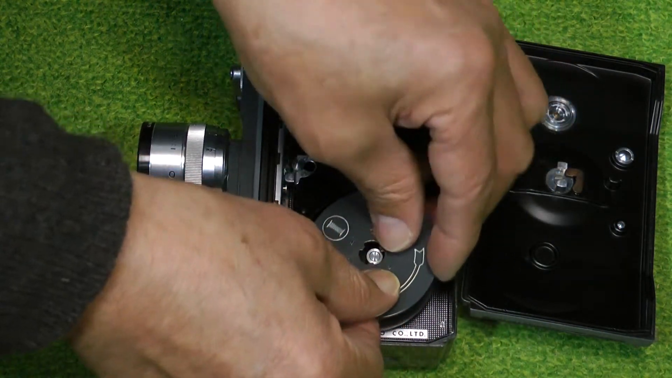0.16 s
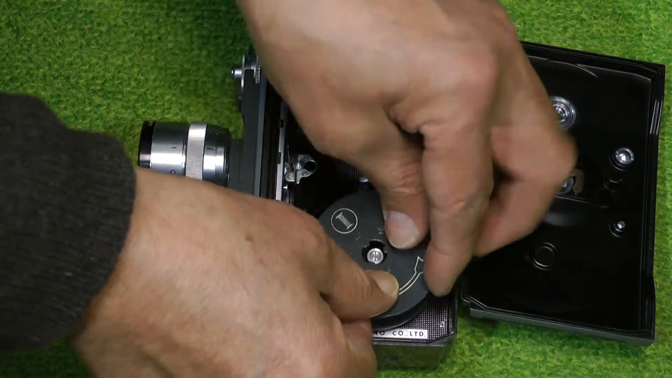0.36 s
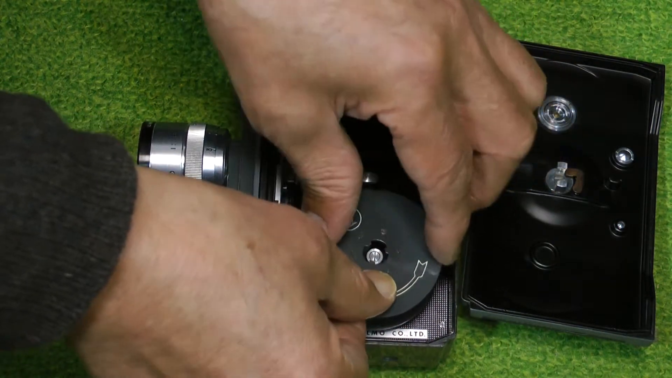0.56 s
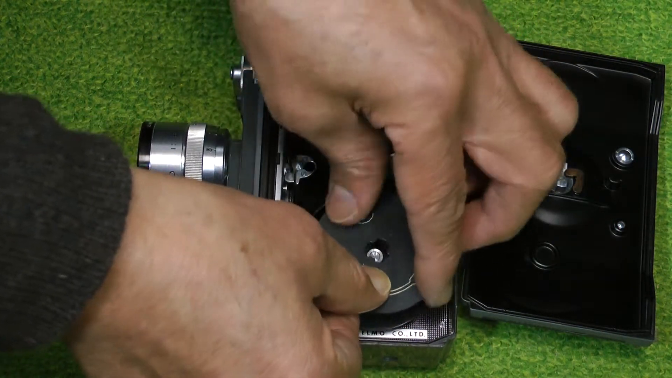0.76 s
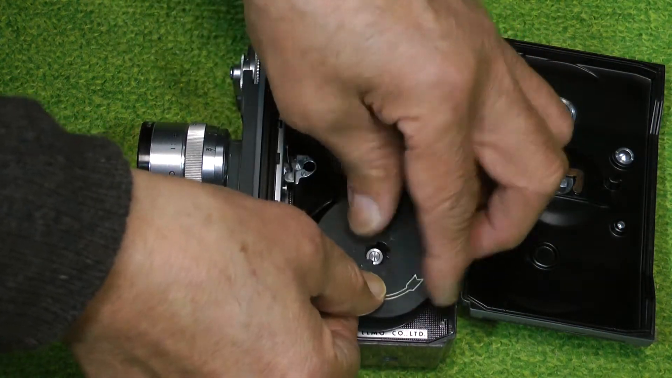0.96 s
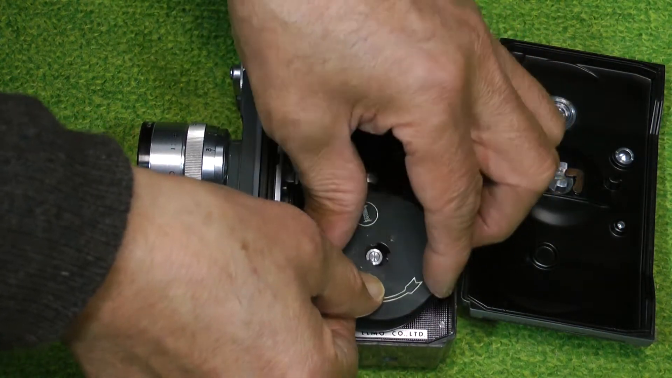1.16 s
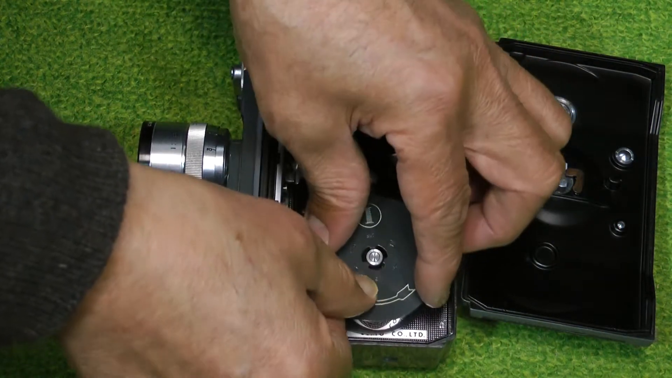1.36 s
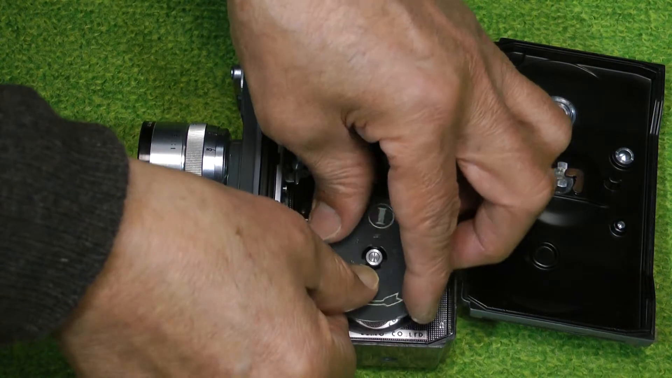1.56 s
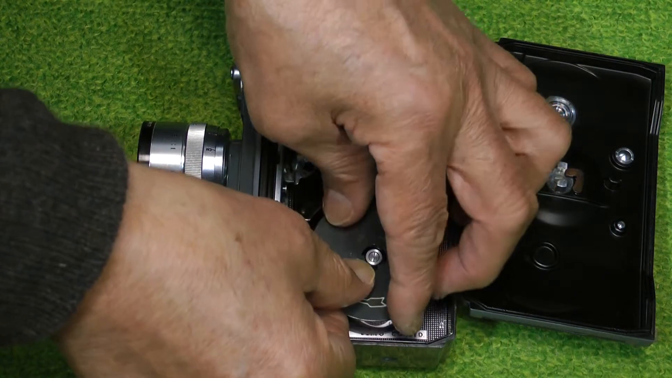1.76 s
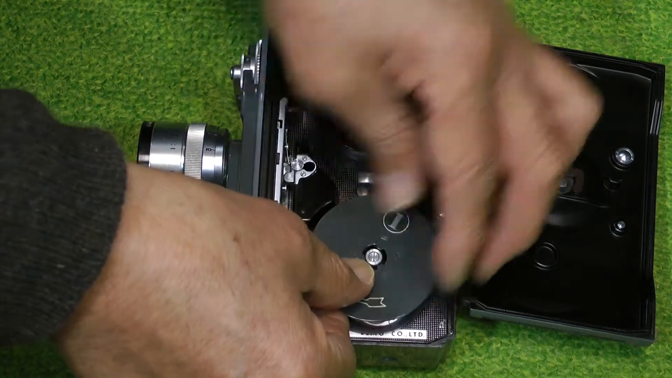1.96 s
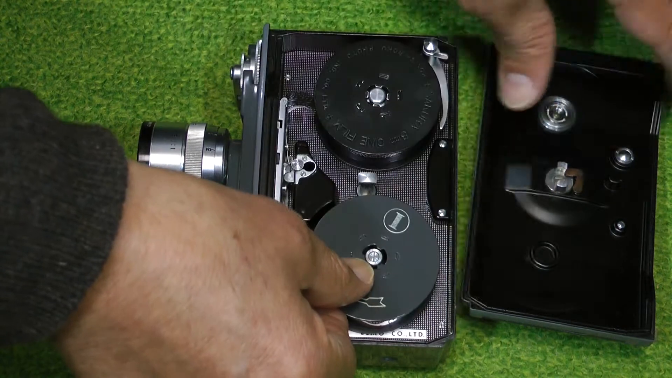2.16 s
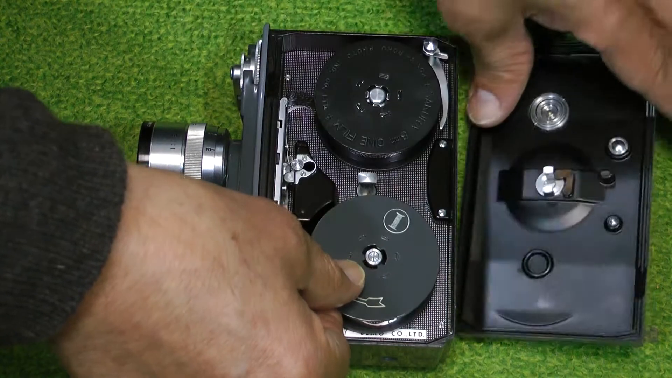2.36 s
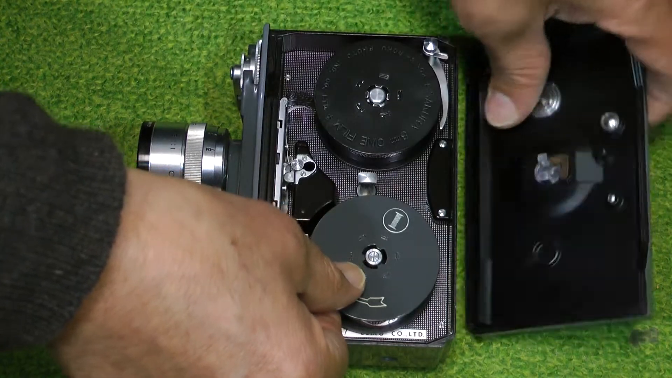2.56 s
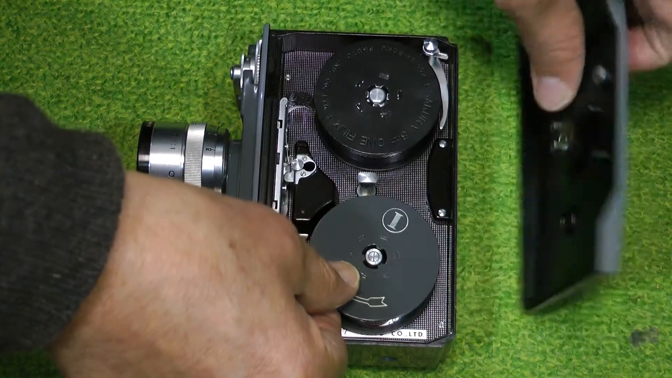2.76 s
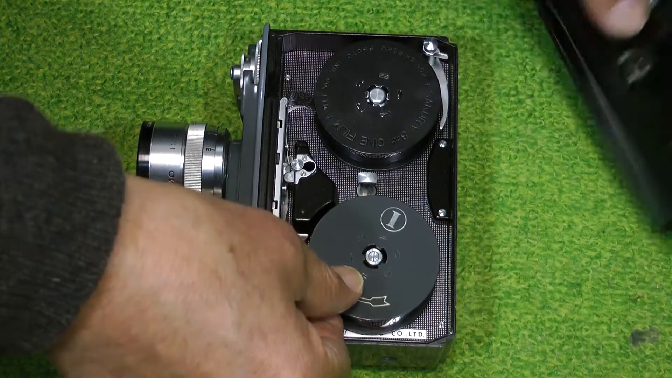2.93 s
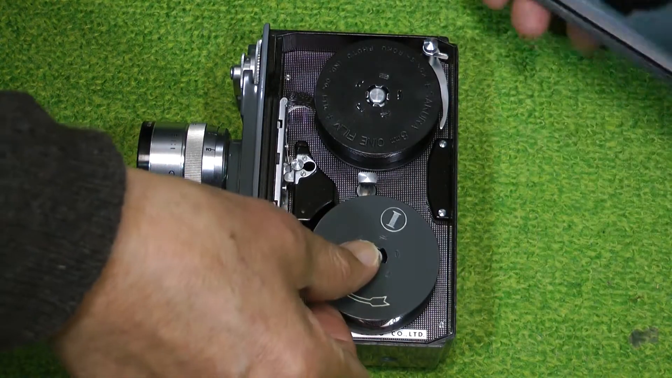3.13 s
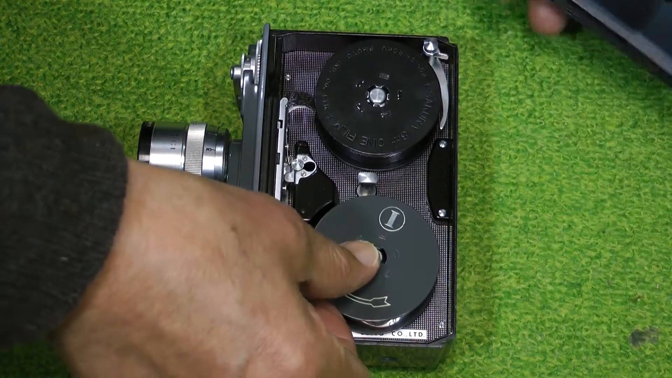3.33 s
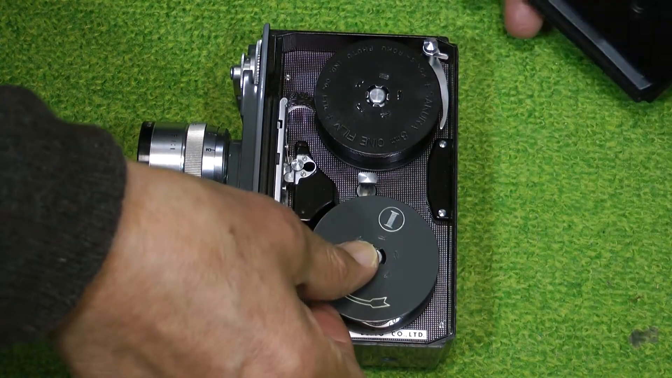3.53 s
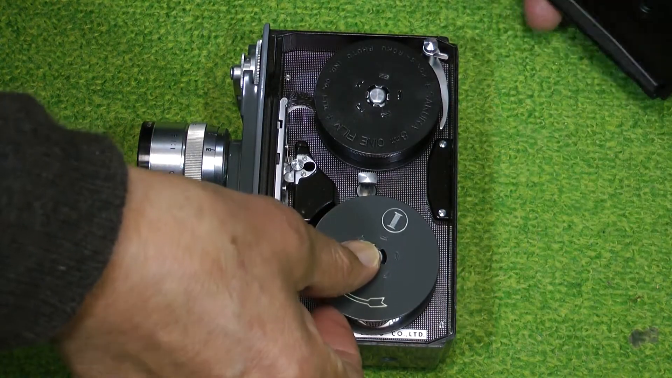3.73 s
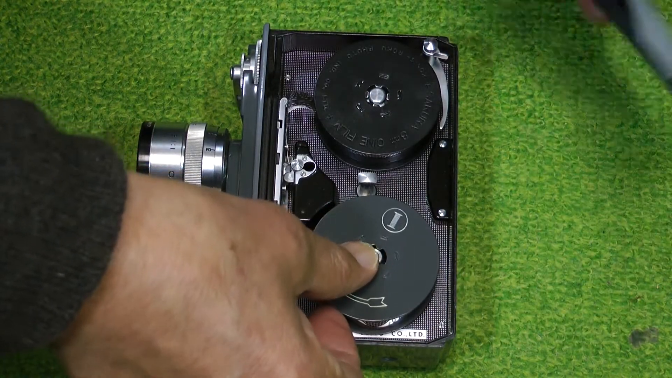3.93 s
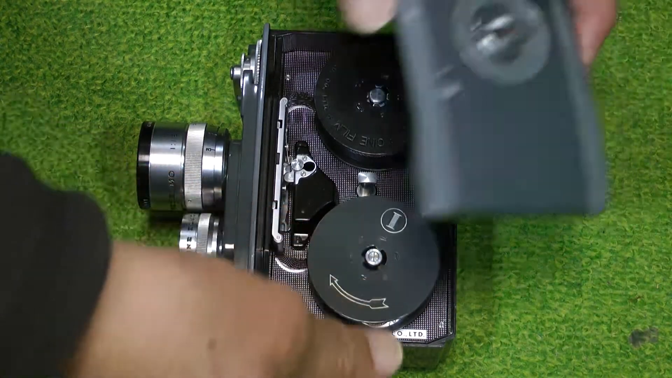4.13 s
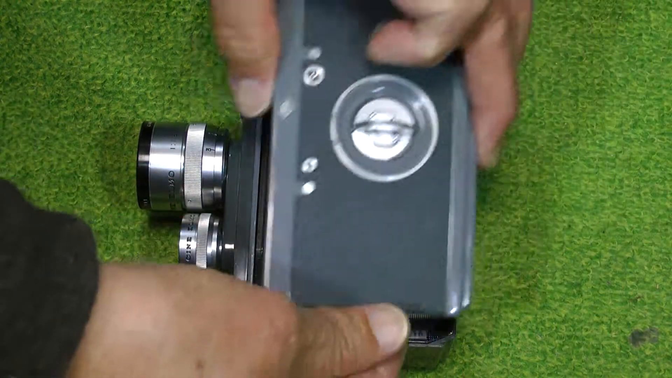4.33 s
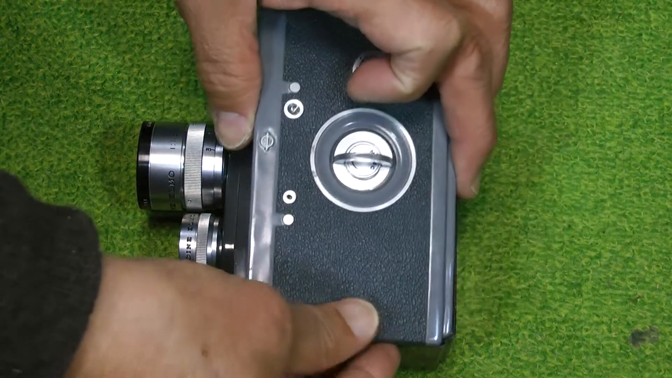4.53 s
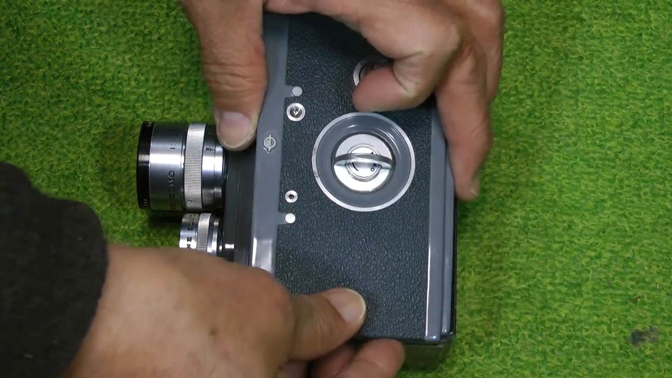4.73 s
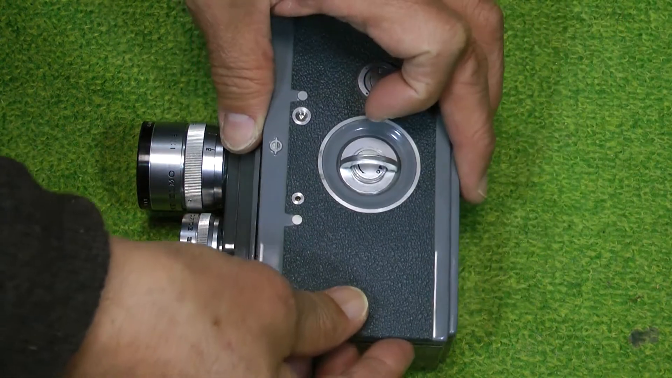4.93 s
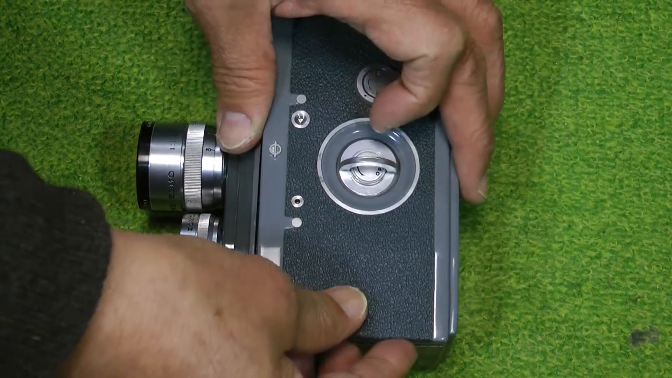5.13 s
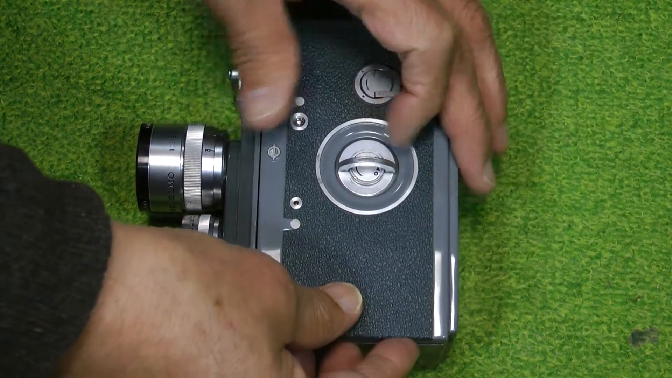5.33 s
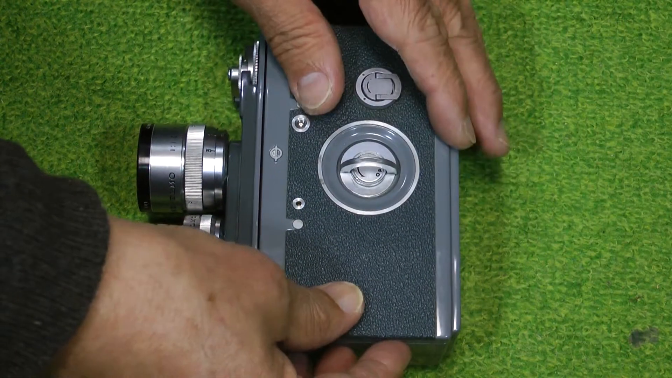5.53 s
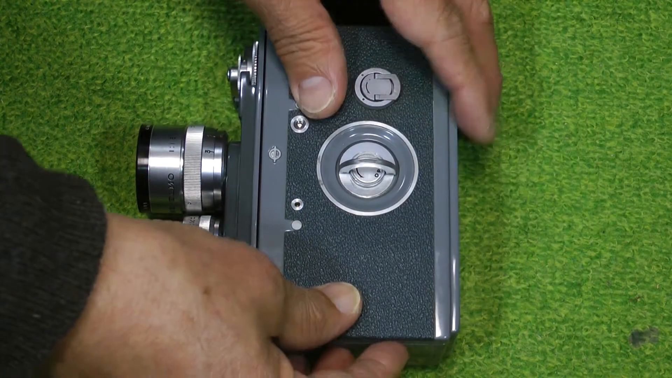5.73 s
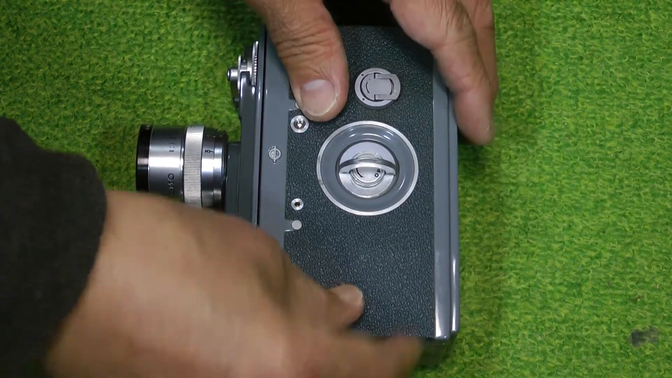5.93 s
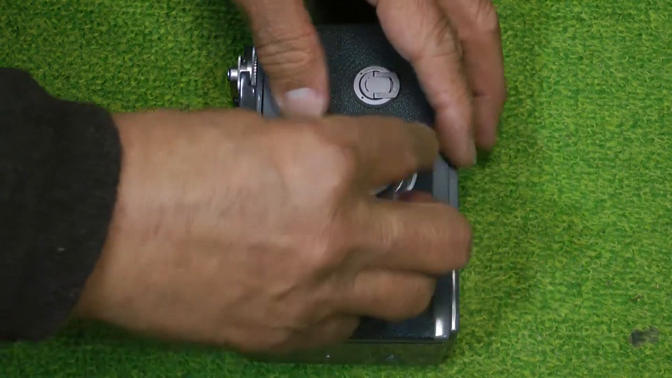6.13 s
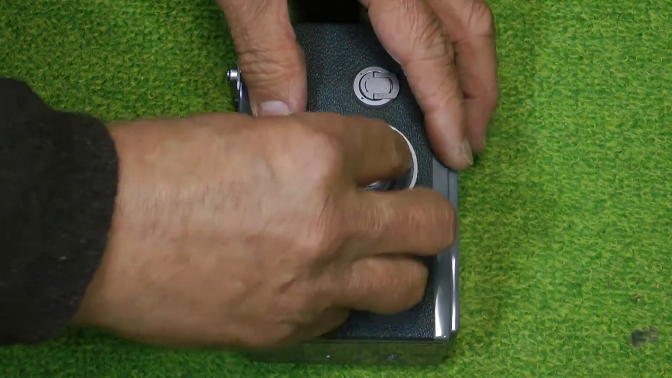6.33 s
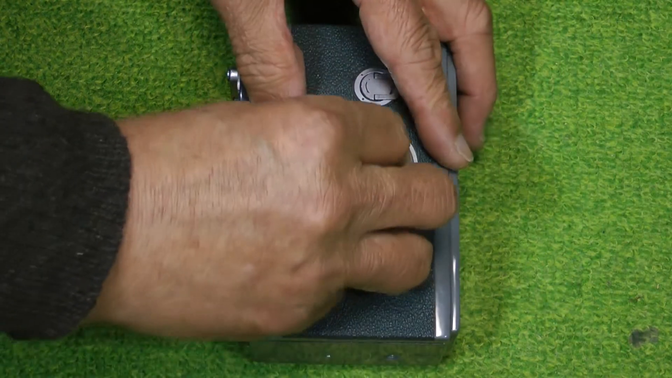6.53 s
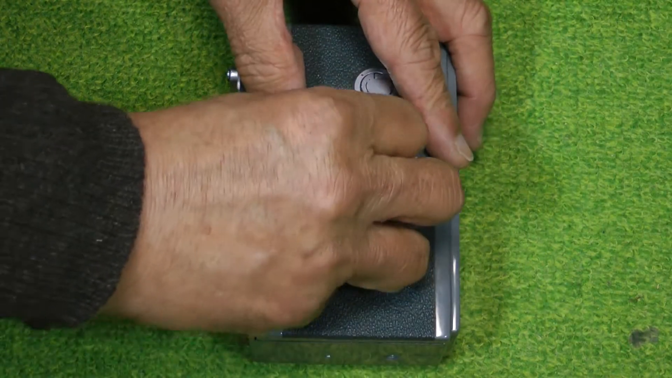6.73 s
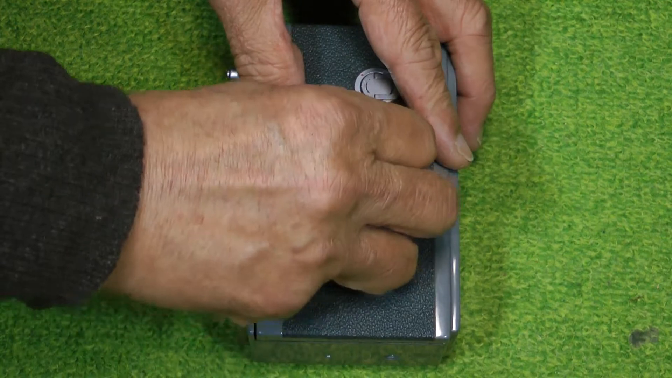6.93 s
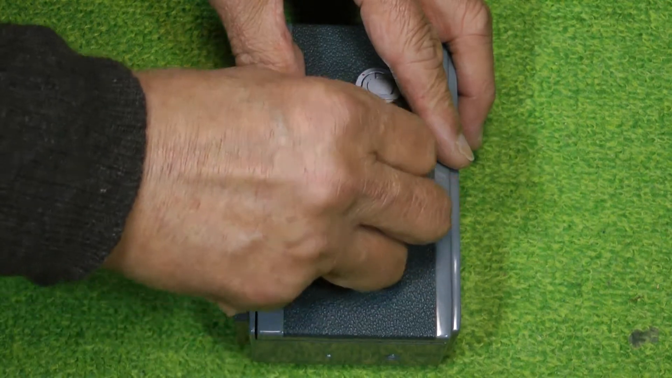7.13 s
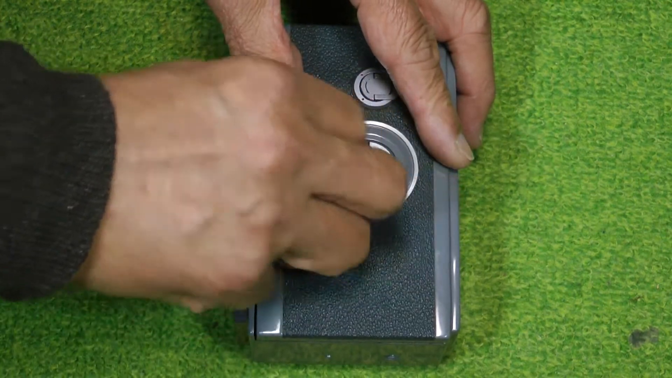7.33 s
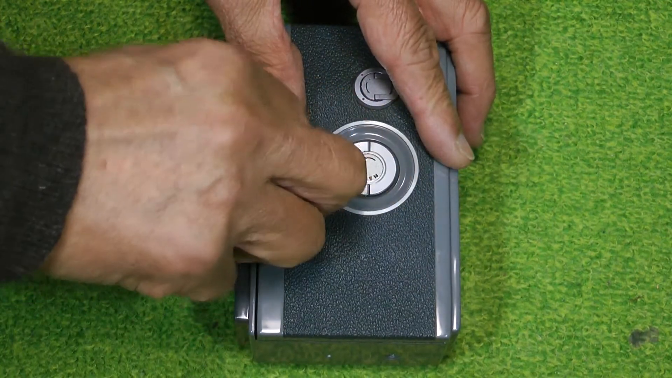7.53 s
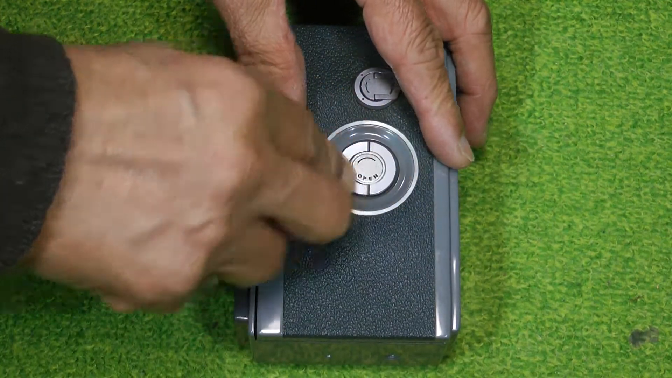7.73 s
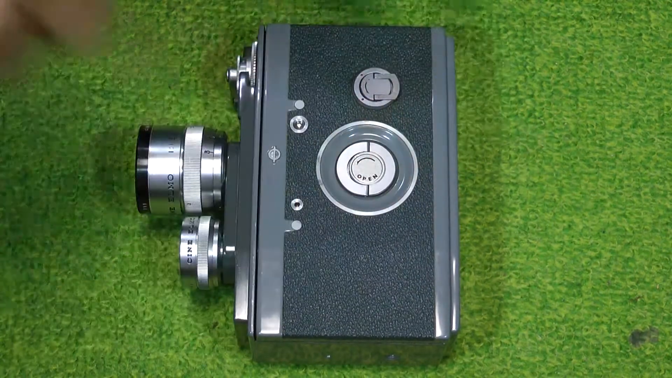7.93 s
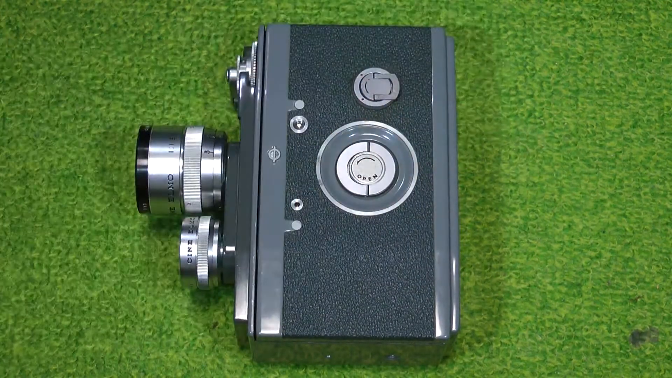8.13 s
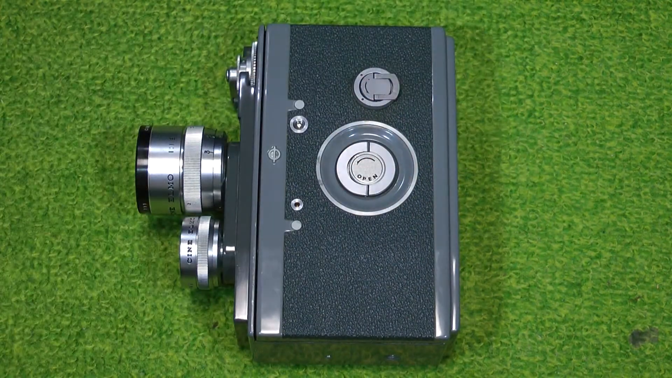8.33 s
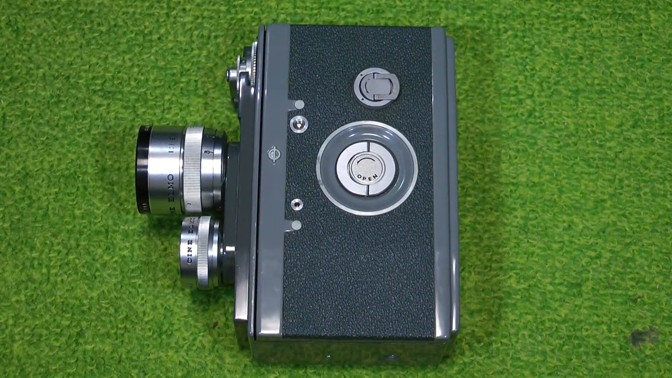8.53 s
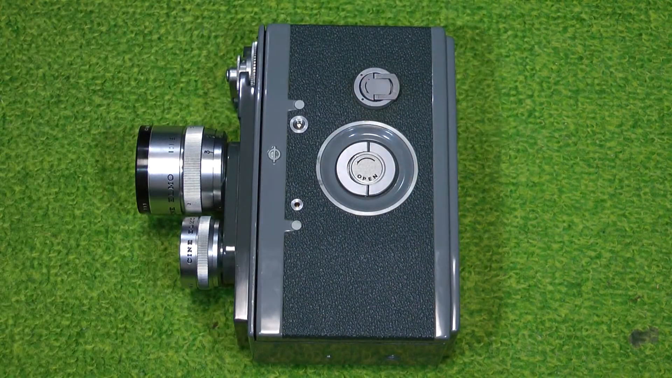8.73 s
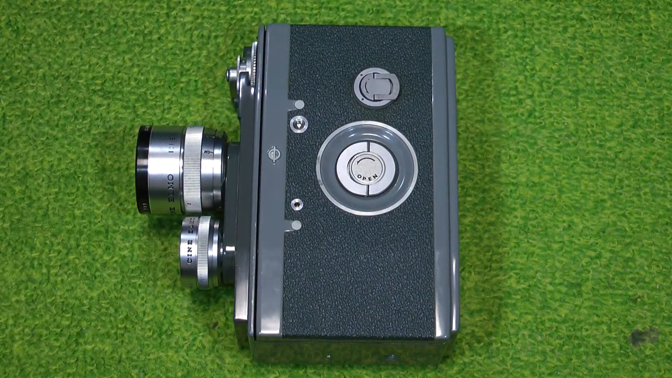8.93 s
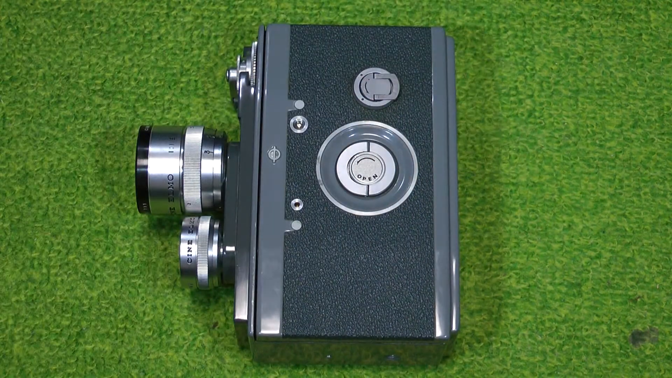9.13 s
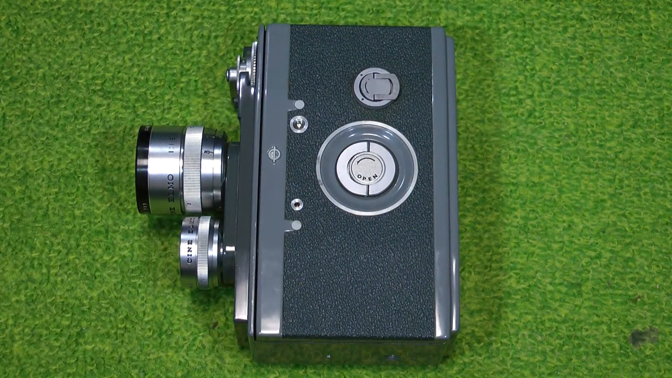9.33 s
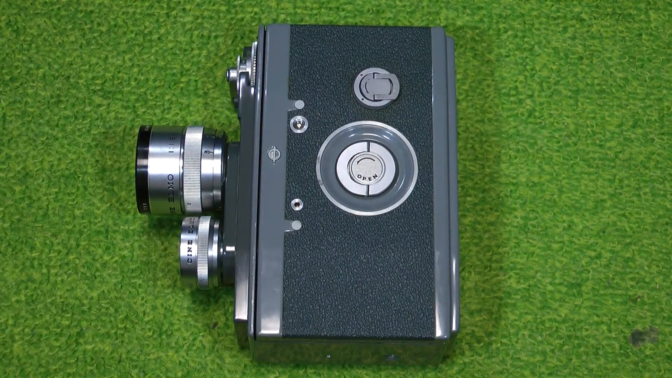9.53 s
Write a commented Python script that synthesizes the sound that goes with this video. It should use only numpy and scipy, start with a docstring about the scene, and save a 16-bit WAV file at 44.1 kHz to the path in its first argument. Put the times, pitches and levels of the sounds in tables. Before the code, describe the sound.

A metal spool knocks, bounces and scrapes as fingers turn it inside a small film camera. The loose lid is picked up with a ringing clack and dragged over felt, then pressed onto the case with clicks and short creaks. A latch spring rings faintly, the lock key snaps flat with a brief rattle, and a sleeve brushes away. The microphone is close, in a quiet, humming room.

```python
"""A small clockwork film camera lies on a felt mat, close under the microphone, in a quiet, humming room.
A metal spool knocks and bounces on its spindle and scrapes as fingers turn it. The lid is picked up,
ringing, dragged over the mat and pressed onto the case, where it creaks, slips and seats. The latch
leaves a spring ringing; the lock key is turned, snaps flat and rattles, and a sleeve brushes away.
Clicks are noise cracks plus ringing modes, rubs are grainy noise; the hardest clicks overload a limiter."""
import sys
import numpy as np
from scipy import signal
from scipy.fft import rfft, irfft, next_fast_len
from scipy.io import wavfile
from scipy.ndimage import uniform_filter1d

SR = 44100
rng = np.random.default_rng(int(sys.argv[2]) if len(sys.argv) > 2 else 0)


def generate_wav(sig):
    """Save sig (samples, or channels by samples) to the path in sys.argv[1] as 16-bit PCM at SR."""
    pcm = np.round(np.clip(np.atleast_2d(sig).T, -1, 1) * 32767).astype(np.int16)
    wavfile.write(sys.argv[1], SR, pcm)


N = 426888
TIME = np.arange(N) / SR

# Room tone, rumble up to hiss: freq_hz, gain_db
ROOM_EQ = [(20, -7), (60, 4.5), (85, 1.5), (180, -2), (260, -2.5), (350, -4), (600, -12), (1500, -16),
           (3500, -20.5), (8000, -27), (16000, -29)]
# Mains hum and a faint whine at 915 Hz: pitch_hz, level_db
HUM_TONES = [(59.7, -61.5), (119.8, -74), (179, -74), (360, -76), (915, -80.5)]

# Fingers push the spool round: start_s, length_s, level_db
FINGER_PUSHES = [(0.0, 0.01, -35), (0.06, 0.18, -54.5), (0.395, 0.029, -39.5), (0.52, 0.49, -50),
                 (1.0, 0.014, -53), (1.09, 0.041, -53), (1.21, 0.11, -52)]
# Tone of that rub: freq_hz, gain_db
FINGER_EQ = [(200, -12), (600, -8), (1400, 0.5), (2400, -6), (3500, 3), (4700, -11), (6500, -5),
             (9000, -20), (13000, -15), (16000, -33.5)]
# The spool's ring: pitch_hz, width_hz, height_db
SPOOL_RING = [(272, 66, 20.5), (778, 58, 1), (1342, 180, 9), (2310, 20, 10), (2600, 200, -6),
              (3450, 60, 7.5), (3463, 330, 16.5), (4003, 110, 14.5), (6030, 750, 5.5), (7790, 37, 12),
              (9200, 700, 4), (11920, 100, 19)]
# Spool on spindle: start_s, level_db, thud_db, knock_db, treble_db_per_octave, bounce_count (-1 mutes)
# In all hit tables, level is at 1.6-4.4 kHz; thud (130-450 Hz) and knock (450-1600 Hz) are relative to it.
SPOOL_KNOCKS = [(0.0522, -36.5, -15, -30, -6.5, 0), (0.2554, -29.5, -13, -10, -5.5, 0),
                (0.2925, -12, -18.5, -17, -2.5, 0), (0.604, -39.5, -12, -11, -6, -1),
                (0.7234, -38.5, -19, -19, -4.5, 0), (0.7417, -17.5, -4.5, -1, -15, 0),
                (0.8843, -11, -11.5, 2.5, -7, 2), (1.2985, -17, -16, 4.5, -9.5, 3.5),
                (1.5454, -30.5, -13.5, -6, -8, 1), (1.6982, -37, -17.5, -8.5, -5.5, 0),
                (1.795, -45, -16.5, -4, -17, 0), (1.991, -57, -8.5, 11.5, -26, -0.5),
                (2.058, -57.5, -11, 13, -22, 0)]
# Hands and lid bump the mat: middle_s, level_db, spread_s
MAT_BUMPS = [(.76, -46, 0.069), (2.44, -42.5, 0.039), (2.61, -37, 0.015), (2.745, -34.5, 0.027),
             (2.85, -43.5, 0.04), (3.90, -51.5, 0.026), (5.15, -45.5, 0.03), (5.62, -44, 0.021),
             (6.27, -52.5, 0.091), (6.78, -35, 0.019), (6.88, -51, 0.047), (7.33, -53, 0.046)]
# Their dull tone: freq_hz, gain_db
BUMP_EQ = [(30, -19.5), (70, -2), (125, 1.5), (190, -16.5), (280, -3.5), (400, -18.5), (700, -29.5),
           (3000, -56.5)]
# The spool's rim scrapes the case: start_s, length_s, level_db
RIM_SCRAPES = [(1.325, 0.022, -28), (1.38, 0.12, -50), (1.545, 0.053, -40), (1.625, 0.12, -40),
               (1.75, 0.19, -49.5)]
# Tone of the scrape: freq_hz, gain_db
RIM_EQ = [(300, -10), (1400, 3.5), (2500, 2.5), (3600, -1.5), (6500, -7), (7800, 0), (9200, -18.5),
          (11750, -10), (16000, -27)]

# The lid slides over the mat: start_s, length_s, level_db
LID_SLIDES = [(2.3, .18, -39), (2.575, 0.65, -42), (2.69, 0.21, -38.5), (3.22, 0.22, -53.5),
              (3.33, 0.12, -48.5), (3.48, 0.05, -46), (3.575, 0.025, -44.5), (3.66, 0.1, -53),
              (3.79, 0.33, -49), (4.08, 0.15, -61)]
# Tone of the slide: freq_hz, gain_db
SLIDE_EQ = [(300, -6), (600, -10), (1500, -13.5), (2100, 3.5), (3800, -6), (4500, -5), (6400, -6.5),
            (7200, -10.5), (12000, -9), (16000, -22)]
# The loose lid's ring: pitch_hz, width_hz, height_db
LID_RING = [(759, 40, 16), (879, 4.9, 31.6), (1552, 260, 16.9), (1965, 18, 16), (2456, 53, 11),
            (2744, 89, 12), (3102, 85, 12), (3476, 200, 17.6), (3930, 110, 16), (5310, 160, 7.1),
            (5740, 670, 11), (6320, 300, 14), (8780, 180, 11), (12600, 68, 9.7)]
# The lid is knocked and lifted: start_s, level_db, thud_db, knock_db, treble_db_per_octave
LID_KNOCKS = [(2.3372, -5, -23, -19, -12.5), (2.3606, -17.5, -17, -3.5, -17.5),
              (2.4256, -11.5, -16.5, -13, -21.5), (2.6781, -44.5, -36, 14.5, -7),
              (3.0016, -32.5, -25, -40, -9), (3.1973, -39.5, -2.5, -1.5, -22.5),
              (3.3331, -27.5, -21.5, -6, -26), (3.3941, -14, -44.5, -19.5, -7),
              (4.0925, -34.5, -10, 2, -11)]

# Lid and latch seat: start_s, level_db, thud_db, knock_db, treble_db_per_octave, slip_count
CASE_CLICKS = [(4.7825, -18, -12, -1.5, -26, 0), (4.8798, -53, 2, 16, -13, 0),
               (4.958, -43, -7.5, -4.5, -11, 0), (5.024, -32, -1, 7, -20.5, 0),
               (5.0618, -45, -8.5, 23.5, -21, 0), (5.1271, -19.5, -14, -4.5, -19, 0),
               (5.2242, -24, -10, 1, -15.5, 0), (5.2633, -9.5, -12.5, 2, -14, 0),
               (5.5629, -7, -12, -4.5, -11.5, 2), (6.2115, -52, 7, 25, -20, 0),
               (6.2345, -28.5, -4, 16, -18.5, 1), (6.2427, -15.5, -14.5, -3, -25, 0),
               (6.3064, -26, -3.5, 2, -18.5, 0), (6.4937, -22, -8, 10.5, -11, 2),
               (6.9704, -28, -18.5, -7, -20, 0), (8.0717, -31.5, -10, -12, -14.5, 0)]
# The closed case's ring: pitch_hz, width_hz, height_db
CASE_RING = [(253, 59, 19), (344, 110, 11), (609, 60, 15.65), (830, 51, 14), (1200, 110, 13),
             (1420, 810, 8.6), (1760, 56, 7.1), (2560, 110, 5.1), (3643, 320, 13), (4044, 50, 9.6),
             (4870, 100, 1.3), (5440, 190, 5), (7800, 60, 3.2)]
# The lid creaks in its seat: middle_s, level_db, spread_s
SEAT_CREAKS = [(5.0, -39, 0.025), (5.185, -39, 0.011), (5.252, -33, 0.0092), (5.46, -39, 0.017),
               (5.545, -32, 0.013), (6.172, -37, 0.017), (6.293, -33.5, 0.017), (6.425, -35, 0.0041)]
# Tone of the creak: freq_hz, gain_db
CREAK_EQ = [(150, -20), (400, -6.5), (650, 8.5), (950, -5), (1500, -15.5), (3400, -20), (6000, -29.5),
            (14000, -47.5)]

# The sleeve passes: middle_s, level_db, spread_s
SLEEVE_PASSES = [(5.79, -57.5, 0.044), (6.1, -61.5, 0.095), (6.55, -61, 0.27), (7.48, -55.5, 0.16),
                 (8.0, -47, .12), (8.3, -43, 0.091), (8.71, -60.5, 0.083)]
# Tone of cloth and fingertips: freq_hz, gain_db
SOFT_RUB_EQ = [(150, -5), (340, 1), (700, -3), (1400, 0), (3300, -2), (4800, -10.5), (7500, -16.5),
               (13000, -18), (16000, -31)]
# Fingers turn the lock key: start_s, length_s, level_db
KEY_TURNS = [(6.135, .2, -53), (6.715, .24, -45.5), (7.265, .1, -55)]
# The key snaps flat: start_s, level_db, thud_db, knock_db, treble_db_per_octave
KEY_SNAPS = [(7.5176, -11.5, -16, -2.5, -1.5)]
# The key's ring: pitch_hz, width_hz, height_db
KEY_RING = [(726, 18, 7.8), (1300, 86, 11), (2630, 330, 8.9), (4170, 130, 4.5), (5970, 330, 11),
            (9000, 80, 11), (8900, 66, 13), (9900, 42, 5.2), (10700, 90, 8), (12380, 110, 10)]
# Tone of its hinge rattle: freq_hz, gain_db
RATTLE_EQ = [(300, -2.5), (1300, -7.5), (3000, -3.5), (4100, -0.5), (6500, -15), (9300, 4), (13000, -1.5),
             (16000, -15.5)]

# Five bands that shape each click: edge_hz
CLICK_BANDS = [130, 450, 1600, 4400, 8500, 16000]
# Final tone of all clicks: freq_hz, gain_db
CLICK_EQ = [(60, -2.5), (120, -0.5), (175, -11), (240, -1), (9000, 1), (12500, 3), (16000, -7.5)]
# Leftward lean of clicks, scaled for each part: freq_hz, left_minus_right_db
CLICK_PAN = [(60, 2), (250, 4.5), (600, 6.5), (1200, 5), (2200, 1), (4000, .7), (10000, 2.5)]
# How alike noise is in the two channels: freq_hz, correlation
STEREO_LIKENESS = [(50, 0.53), (200, 0.1), (1000, 0.51), (3000, 0.96), (6000, 0.16), (12000, .15)]


def from_db(db):
    return 10 ** (np.asarray(db) / 20)


def rms_one(x):
    return x / np.sqrt(np.mean(x ** 2) + 1e-20)


def at_hz(points, hz):
    """Reads a curve on a log-frequency axis."""
    known_hz, values = np.transpose(points)
    return np.interp(np.log(np.maximum(hz, 1)), np.log(known_hz), values)


def eq(x, points):
    """Minimum-phase EQ through points of freq_hz, gain_db."""
    size = 2 * next_fast_len(x.shape[-1] // 2 + 1)
    cepstrum = irfft(np.log(from_db(at_hz(points, np.fft.rfftfreq(size, 1 / SR)))))
    cepstrum[1:size // 2] *= 2
    cepstrum[size // 2 + 1:] = 0
    return irfft(rfft(x, size) * np.exp(rfft(cepstrum)))[..., :x.shape[-1]]


def strokes(rows, attack_s, sag_db_per_s, release_t60_s):
    """Envelope of pushes: each gets going, loses speed, then dies away."""
    power, t = np.zeros(N), TIME[:2 * SR]
    for start_s, length_s, level_db in rows:
        release_db = 60 * np.maximum(t - length_s, 0) / release_t60_s
        gain = np.clip(t / attack_s, 0, 1) * from_db(level_db - sag_db_per_s * t - release_db)
        start = round(start_s * SR)
        power[start:start + len(t)] += gain[:N - start] ** 2
    return np.sqrt(power)


def swells(rows):
    """Envelope of smooth moves, each a bell curve."""
    return sum(from_db(level_db) * np.exp(-.5 * np.minimum(((TIME - middle_s) / spread_s) ** 2, 100))
               for middle_s, level_db, spread_s in rows)


def repeated(hits, gap_s, loss_db):
    """Gives each hit its run of weaker touches: after it, or before it if the gap is negative."""
    return [(start_s + k * gap_s, level_db - k * loss_db, *tone)
            for start_s, level_db, *tone, count in hits for k in range(round(count) + 1)]


def stereo_noise():
    """White noise whose stereo width varies with frequency."""
    size = next_fast_len(N)
    alike = at_hz(STEREO_LIKENESS, np.fft.rfftfreq(size, 1 / SR))
    mid, side = rfft(rng.standard_normal((2, size)))
    spectrum = np.sqrt(1 + alike) * mid + np.sqrt(1 - alike) * side * [[1], [-1]]
    return rms_one(irfft(spectrum, size)[:, :N])


def dying_noise(t, t60_s, channels):
    """A burst of unit energy: countless small modes that die together."""
    burst = rng.standard_normal((channels, len(t))) * from_db(-60 * t / t60_s)
    return burst / np.sqrt(np.sum(burst ** 2, axis=1, keepdims=True))


def ringing(modes, t, scatter_db=0, damping_hz=0):
    """Decaying sines; scatter varies their strength from touch to touch and between channels."""
    hz, width_hz, height_db = np.transpose(modes)
    scatter = rng.standard_normal(len(hz)) + rng.standard_normal((2, len(hz)))
    strength = from_db(height_db + scatter_db * scatter) * 2 * np.pi * width_hz / SR
    polarity = (-1) ** np.arange(len(hz))
    decay = np.exp(-np.pi * np.outer(width_hz + damping_hz, t))
    return (strength * polarity) @ (decay * np.sin(2 * np.pi * np.outer(hz, t)))


def band_levels(x, size=441):
    """Level in dB of the first 10 ms in each click band."""
    power = np.mean(np.abs(rfft(x[:, :size], 10 * size)) ** 2, axis=0) / (10 * size ** 2 / 2)
    hz = np.fft.rfftfreq(10 * size, 1 / SR)
    return 10 * np.log10(np.histogram(hz, CLICK_BANDS, weights=power)[0])


def panned(x, pan_db):
    """Makes the left channel louder than the right by pan_db."""
    return x * from_db([[pan_db / 2], [-pan_db / 2]])


def mic_pair(x, lean, lag_s=1.8e-5):
    """The left microphone port is nearer: louder there, and slightly earlier."""
    left = eq(x[0], np.array(CLICK_PAN) * [1, lean / 2])
    right = eq(x[1], np.array(CLICK_PAN) * [1, -lean / 2])
    size = next_fast_len(N)
    delay = np.exp(-2j * np.pi * np.fft.rfftfreq(size, 1 / SR) * lag_s)
    return np.array([left, irfft(rfft(right, size) * delay, size)[:N]])


def strikes(hits, modes, crack_t60_s, chatter_t60_s, chatter_db, scatter_db, scuff_db, scuff_t60_s,
            lean=.95, held_from_s=0, damping_hz=0):
    """Each contact scuffs in, cracks, chatters and rings the modes, then gets its own EQ."""
    track, t = np.zeros((2, N)), TIME[:SR // 2]
    centres_hz = np.sqrt(np.multiply(CLICK_BANDS[1:], CLICK_BANDS[:-1]))
    lead = SR // 200  # the scuff starts 5 ms early
    for start_s, level_db, thud_db, knock_db, slope in hits:
        crack = dying_noise(t, crack_t60_s, channels=1)
        chatter = from_db(chatter_db) * dying_noise(t, chatter_t60_s, channels=1)
        hit = crack + chatter + ringing(modes, t, scatter_db, damping_hz * (start_s > held_from_s))
        scuff = from_db(scuff_db) * dying_noise(t[:lead], scuff_t60_s, channels=2)[:, ::-1]
        wanted_db = level_db + np.array([thud_db, knock_db, 0, slope, 2 * slope])
        click = eq(np.hstack([scuff, hit]), np.c_[centres_hz, wanted_db - band_levels(hit)])
        start = round(start_s * SR) - lead
        track[:, start:start + click.shape[1]] += click[:, :N - start]
    return mic_pair(eq(track, CLICK_EQ), lean)


def friction(tone, grain_db, grains_per_s):
    """Surface bumps catch and let go: noise whose strength jumps from grain to grain."""
    grains = np.clip(rng.standard_normal(N), -2, 2)
    strength = from_db(grain_db * np.interp(TIME * grains_per_s, np.arange(N), grains))
    return rms_one(eq(stereo_noise() * strength, tone))


def rub(gain, tone, modes, ring_db, grain_db, grains_per_s, pan_db):
    """Friction on a part, heard directly and through that part's modes."""
    force = friction(tone, grain_db, grains_per_s) * gain
    ring = signal.fftconvolve(force, ringing(modes, TIME[:SR // 2]), axes=1)[:, :N]
    return panned(force + from_db(ring_db) * ring, pan_db)


def room_tone(noise_db=-58):
    """A bed of rumble, hiss and mains hum."""
    hum = sum(np.sqrt(2) * from_db(level_db) * np.sin(2 * np.pi * (hz * TIME + rng.random()))
              for hz, level_db in HUM_TONES)
    return from_db(noise_db) * rms_one(eq(stereo_noise(), ROOM_EQ)) + hum


def spool_turning():
    """Fingers rub the spool round and faintly ring it."""
    gain = strokes(FINGER_PUSHES, attack_s=.0064, sag_db_per_s=6, release_t60_s=.2)
    return rub(gain, FINGER_EQ, SPOOL_RING, ring_db=-18, grain_db=4.5, grains_per_s=780, pan_db=2)


def spool_knocks():
    """The metal spool hits its spindle, each bounce weaker."""
    hits = repeated(SPOOL_KNOCKS, gap_s=.0123, loss_db=7.5)
    return strikes(hits, SPOOL_RING, crack_t60_s=.029, chatter_t60_s=.052, chatter_db=.5,
                   scatter_db=2.5, scuff_db=-9, scuff_t60_s=.0071)


def mat_bumps():
    """Hands and lid press on the mat: soft swells of low noise."""
    return panned(swells(MAT_BUMPS) * rms_one(eq(stereo_noise(), BUMP_EQ)), pan_db=5)


def rim_scrapes():
    """The spool's rim drags on the case with a coarse grain."""
    gain = strokes(RIM_SCRAPES, attack_s=.0067, sag_db_per_s=59.5, release_t60_s=.14)
    return rub(gain, RIM_EQ, SPOOL_RING, ring_db=-8.5, grain_db=6, grains_per_s=410, pan_db=2)


def lid_slides():
    """Felt rubs the sliding lid and sets it ringing."""
    gain = strokes(LID_SLIDES, attack_s=.04, sag_db_per_s=11.5, release_t60_s=.12)
    return rub(gain, SLIDE_EQ, LID_RING, ring_db=-10, grain_db=3, grains_per_s=610, pan_db=3)


def lid_knocks():
    """The loose lid rings freely at first; a hand damps the later knocks."""
    return strikes(LID_KNOCKS, LID_RING, crack_t60_s=.0048, chatter_t60_s=.03, chatter_db=4,
                   scatter_db=3, scuff_db=-17, scuff_t60_s=.012, held_from_s=2.55, damping_hz=22.3)


def case_clicks():
    """Lid and latch click home, some after a quick run of growing slips."""
    hits = repeated(CASE_CLICKS, gap_s=-.0046, loss_db=7)
    return strikes(hits, CASE_RING, crack_t60_s=.016, chatter_t60_s=.035, chatter_db=6,
                   scatter_db=4.5, scuff_db=-18, scuff_t60_s=.0089, lean=1.3)


def seat_creaks():
    """The pressed lid rubs in its seat and rings the case."""
    gain = swells(SEAT_CREAKS)
    return rub(gain, CREAK_EQ, CASE_RING, ring_db=-14, grain_db=2.5, grains_per_s=110, pan_db=4.5)


def sleeve():
    """Fine-grained cloth brushes past as the arm moves."""
    return panned(swells(SLEEVE_PASSES) * friction(SOFT_RUB_EQ, grain_db=2, grains_per_s=840), pan_db=3.5)


def key_turning():
    """Fingertips rub as they grip and turn the lock key."""
    gain = strokes(KEY_TURNS, attack_s=.013, sag_db_per_s=44.5, release_t60_s=.25)
    return panned(gain * friction(SOFT_RUB_EQ, grain_db=4.5, grains_per_s=330), pan_db=2.5)


def latch_spring(start_s=6.494, pitch_hz=1690, level_db=-53.5, t60_s=.97):
    """A spring rings on once the latch has closed: one thin, fading tone."""
    t = np.maximum(TIME - start_s, 0)
    return from_db(level_db - 60 * t / t60_s) * np.sin(2 * np.pi * pitch_hz * t)


def key_snap():
    """The key snaps flat with a bright, clean crack."""
    return strikes(KEY_SNAPS, KEY_RING, crack_t60_s=.027, chatter_t60_s=.03, chatter_db=-15,
                   scatter_db=2.5, scuff_db=-23, scuff_t60_s=.0061)


def hinge_rattle(rise_s=.016, level_db=-17.5):
    """The snap shakes the key's hinge, which rattles and dies away."""
    shakes = [(start_s, rise_s, level_db) for start_s, *_ in KEY_SNAPS]
    gain = strokes(shakes, attack_s=rise_s, sag_db_per_s=0, release_t60_s=.125)
    return rub(gain, RATTLE_EQ, KEY_RING, ring_db=-8.5, grain_db=1, grains_per_s=600, pan_db=-1)


def room_reverb(x, t60_s=.15, send_db=-12, build_s=.027):
    """A short diffuse tail, duller than the direct sound."""
    t = TIME[:SR // 2]
    tail = dying_noise(t, t60_s, channels=2) * np.clip(t / build_s, 0, 1)
    tail = eq(tail, [(100, 5), (300, 8), (700, -.5), (3500, -3), (6000, -3), (14000, -5)])
    return from_db(send_db) * signal.fftconvolve(x, tail, axes=1)[:, :N]


def scene():
    """The mix: only the clicks feed the reverb."""
    clicks = spool_knocks() + lid_knocks() + case_clicks() + key_snap()
    reverb = room_reverb(clicks)
    rubs = spool_turning() + rim_scrapes() + lid_slides() + seat_creaks() + hinge_rattle()
    hands = sleeve() + key_turning() + mat_bumps()
    return clicks + reverb + rubs + latch_spring() + hands + room_tone()


def limiter(x, threshold, knee, depth_db, attack_s, release_s, thump_gain, leak_highpass_hz):
    """Overload ducks the gain; the control voltage leaks into the signal as a low thump."""
    sidechain = signal.sosfilt(signal.butter(1, 700, "high", fs=SR, output="sos"), x)
    level = np.sqrt(np.abs(uniform_filter1d(np.clip(sidechain, -1, 1) ** 2, size=66, axis=1)))
    overload = np.clip((level - threshold) / knee, 1e-9, 1)
    fall = TIME / release_s
    held = np.exp(np.maximum.accumulate(np.log(overload) + fall, axis=1) - fall)  # decaying peak hold
    pole = np.exp(-1 / (attack_s * SR))
    control = signal.lfilter([1 - pole], [1, -pole], held)
    leak = signal.sosfilt(signal.butter(1, leak_highpass_hz, "high", fs=SR, output="sos"), control)
    return x * from_db(-depth_db * control) - thump_gain * leak


def record(dry):
    """A slow limiter, hard clipping of what gets past it, and the top cut off."""
    limited = limiter(dry, threshold=.52, knee=.05, depth_db=6.5, attack_s=.003, release_s=.08,
                      thump_gain=.12, leak_highpass_hz=6.1)
    top_cut = signal.cheby2(20, 70, 16600, fs=SR, output="sos")  # 70 dB down from 16.6 kHz
    return signal.sosfilt(top_cut, np.clip(limited, -1, 1))


dry = scene()
out = record(dry)
generate_wav(out)
```